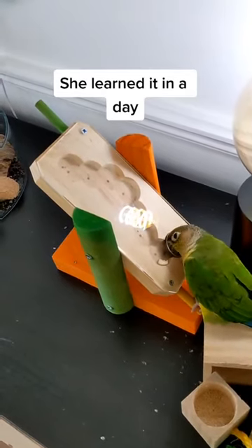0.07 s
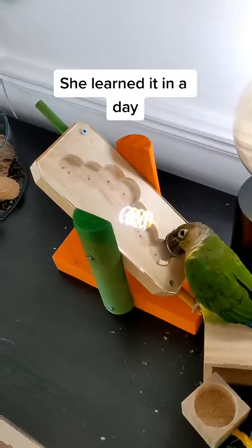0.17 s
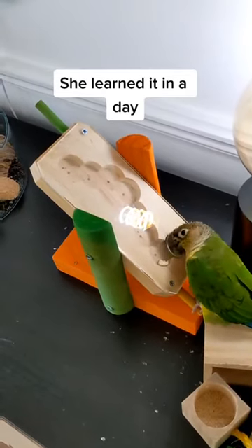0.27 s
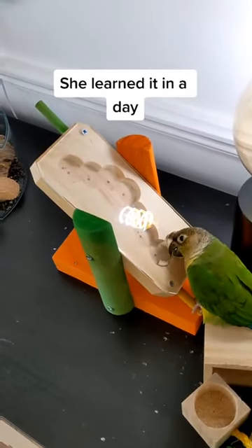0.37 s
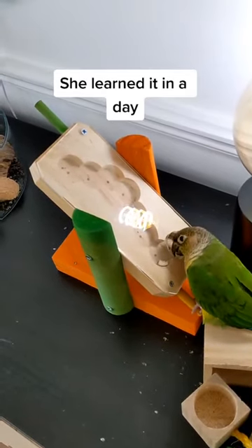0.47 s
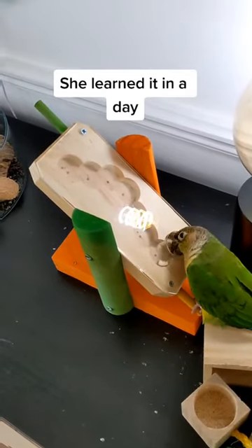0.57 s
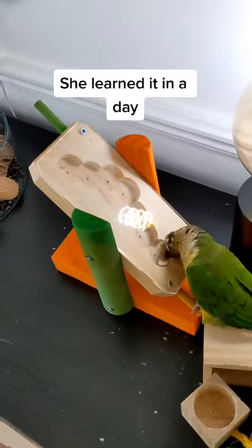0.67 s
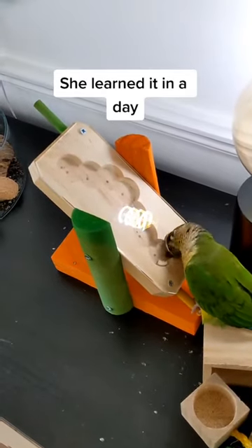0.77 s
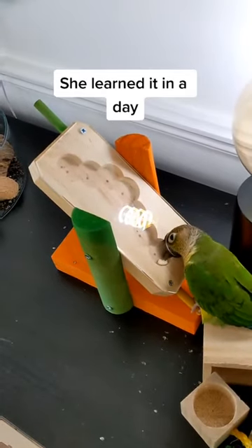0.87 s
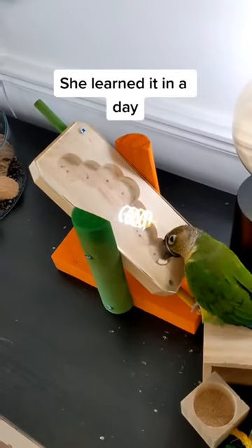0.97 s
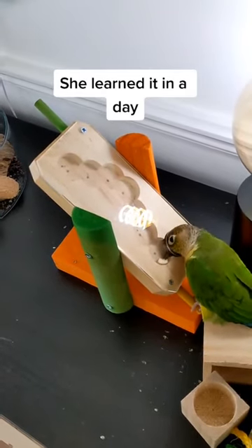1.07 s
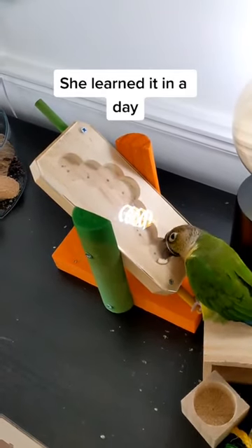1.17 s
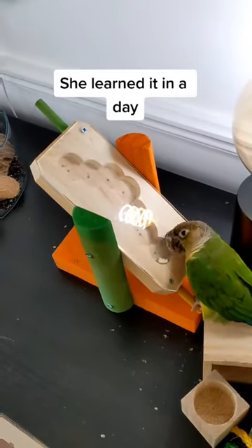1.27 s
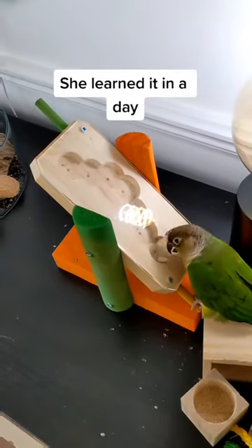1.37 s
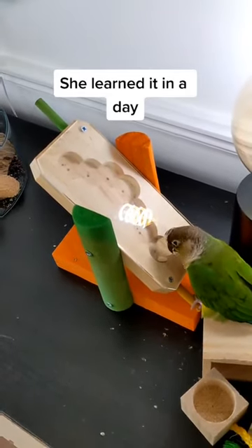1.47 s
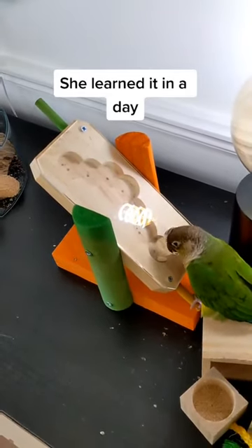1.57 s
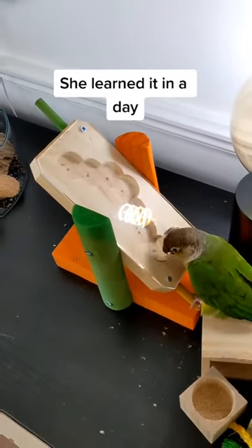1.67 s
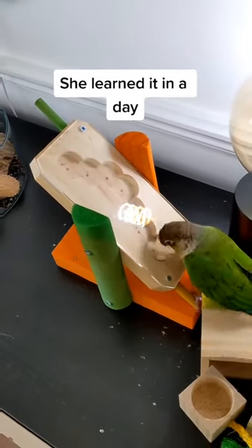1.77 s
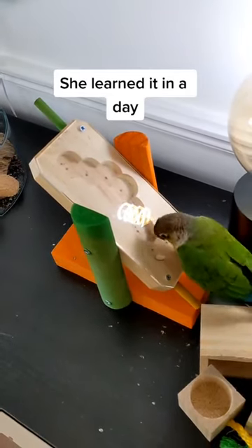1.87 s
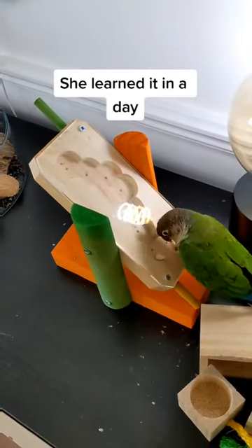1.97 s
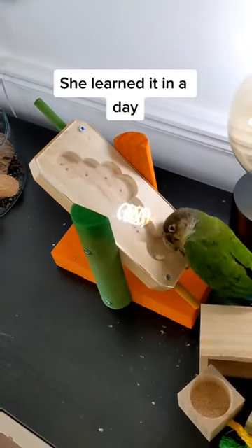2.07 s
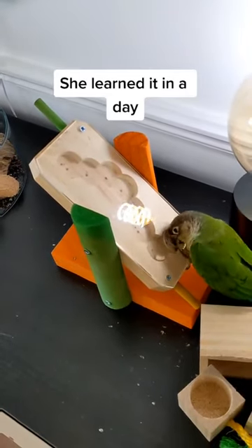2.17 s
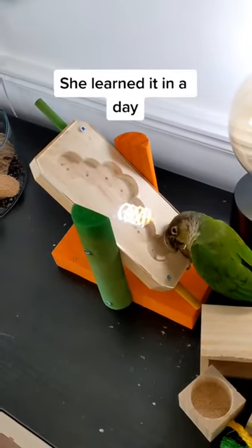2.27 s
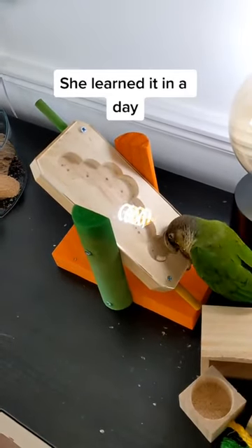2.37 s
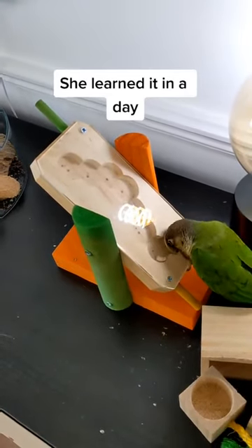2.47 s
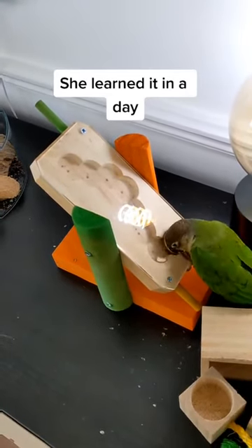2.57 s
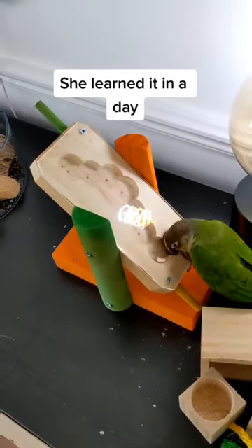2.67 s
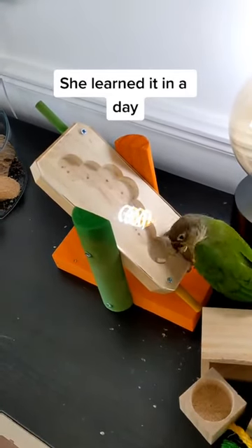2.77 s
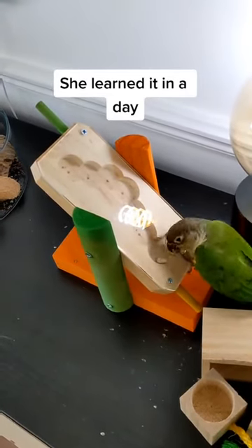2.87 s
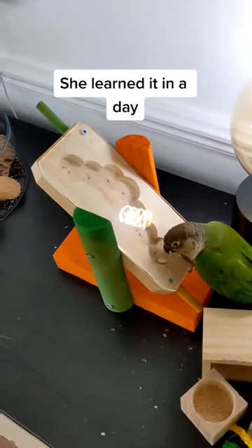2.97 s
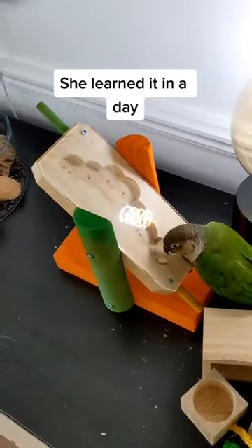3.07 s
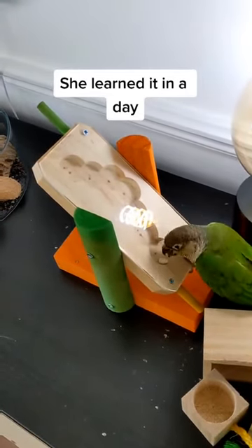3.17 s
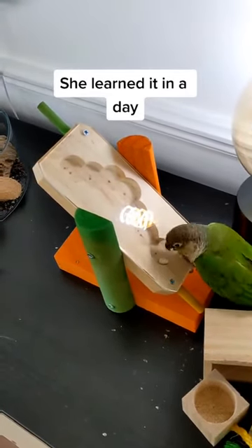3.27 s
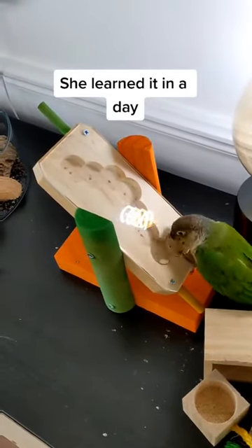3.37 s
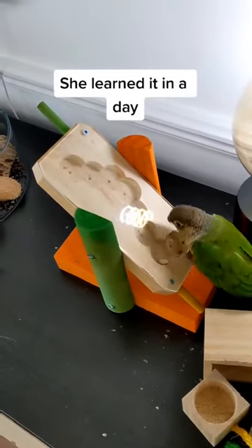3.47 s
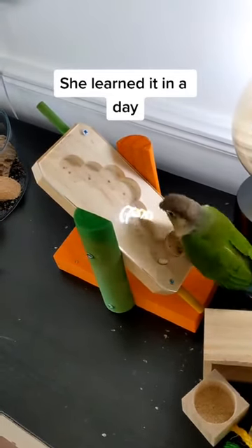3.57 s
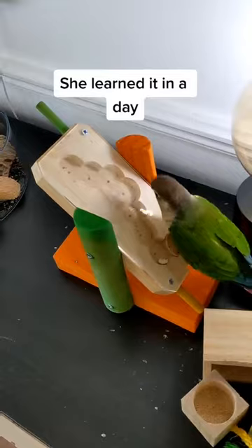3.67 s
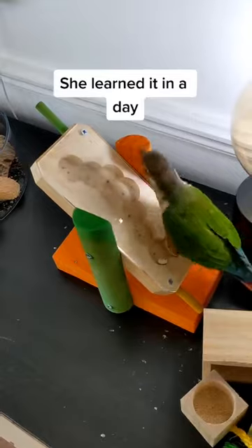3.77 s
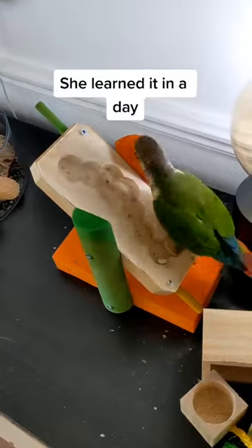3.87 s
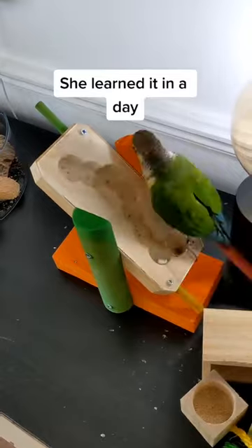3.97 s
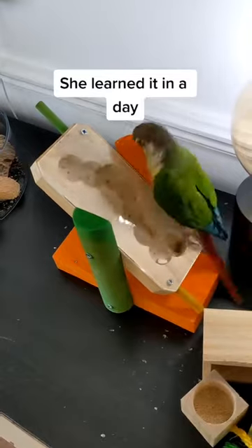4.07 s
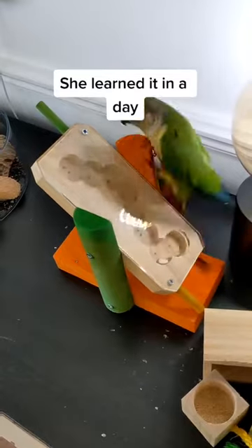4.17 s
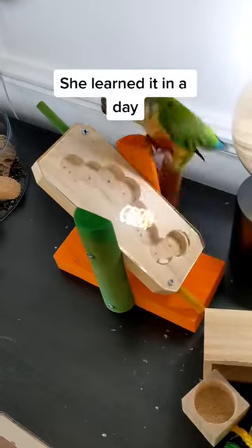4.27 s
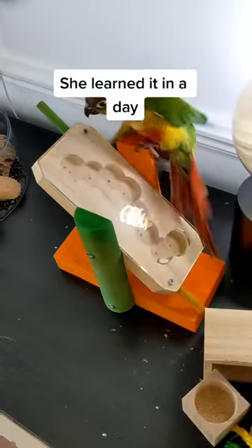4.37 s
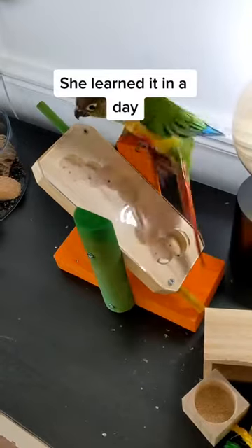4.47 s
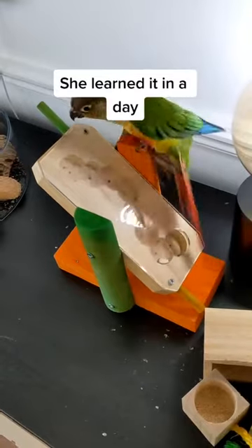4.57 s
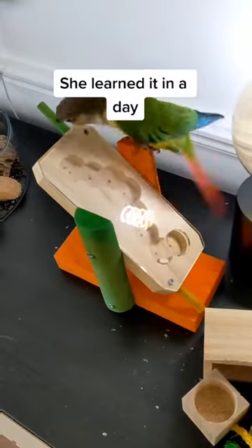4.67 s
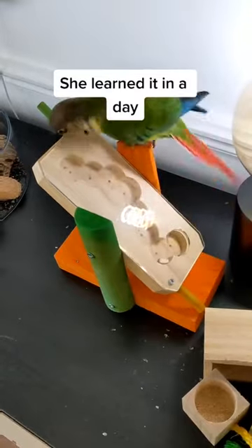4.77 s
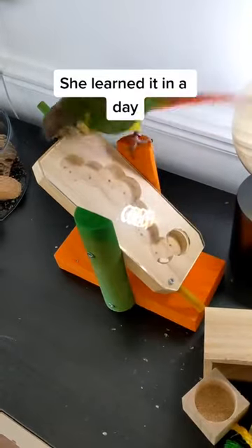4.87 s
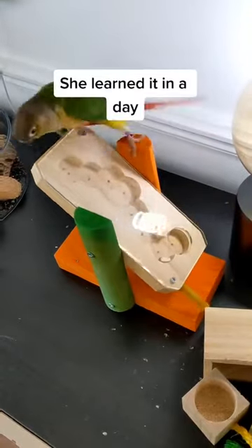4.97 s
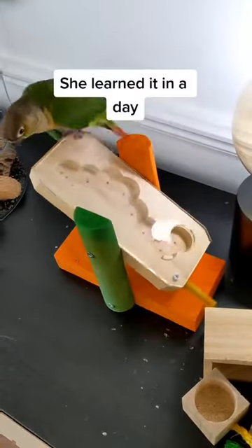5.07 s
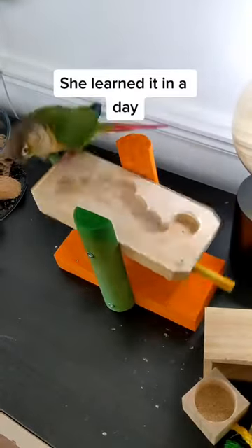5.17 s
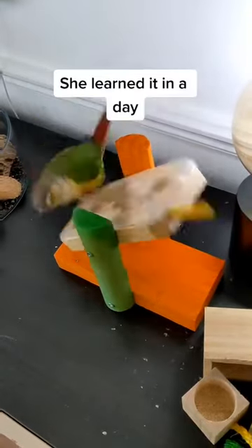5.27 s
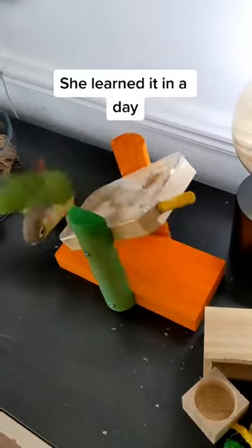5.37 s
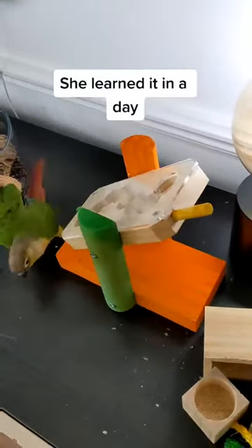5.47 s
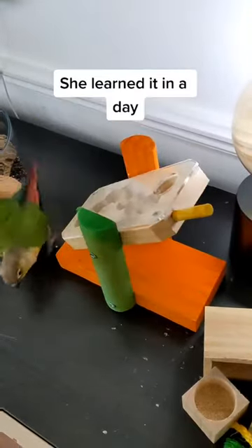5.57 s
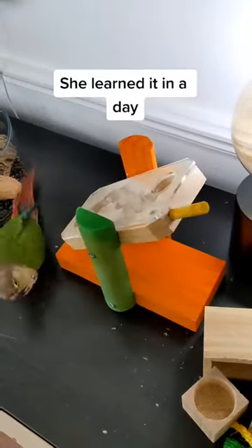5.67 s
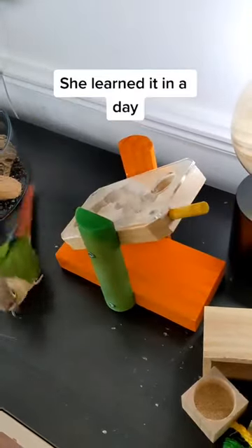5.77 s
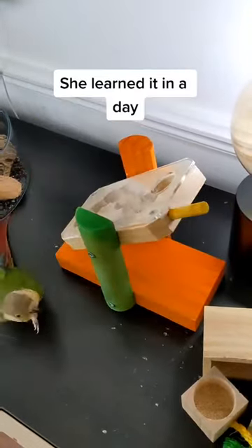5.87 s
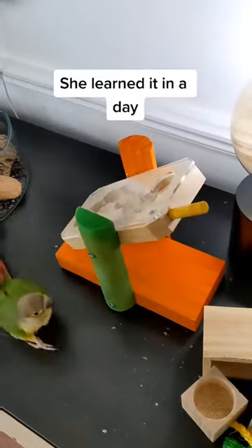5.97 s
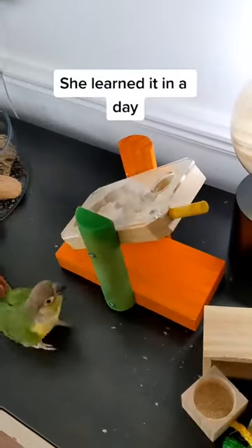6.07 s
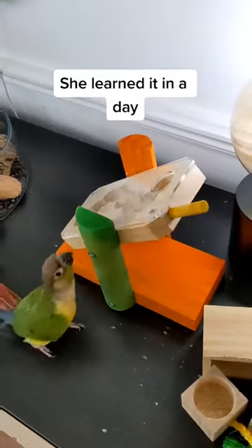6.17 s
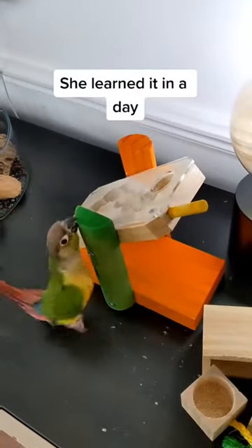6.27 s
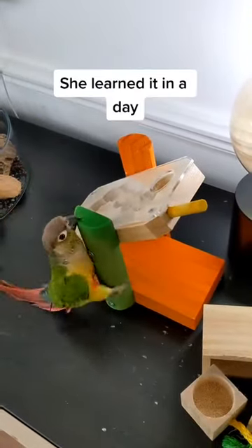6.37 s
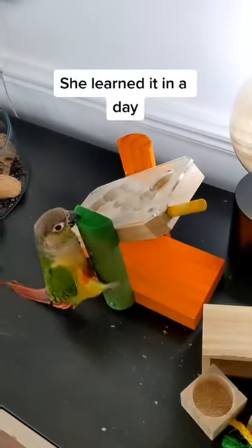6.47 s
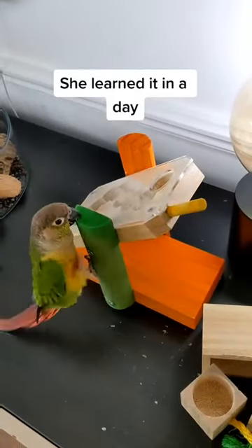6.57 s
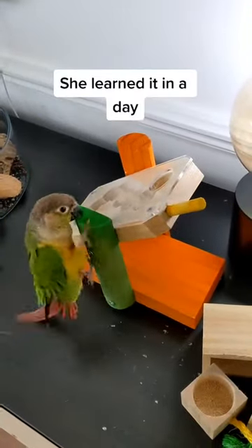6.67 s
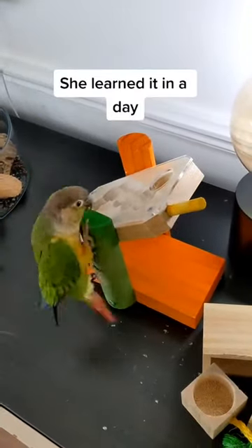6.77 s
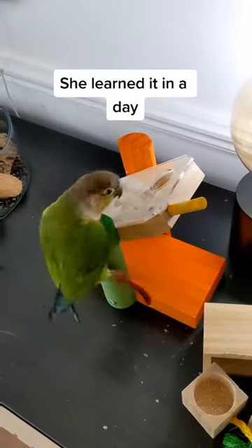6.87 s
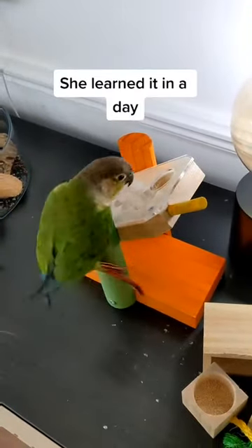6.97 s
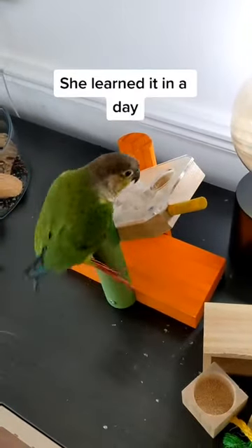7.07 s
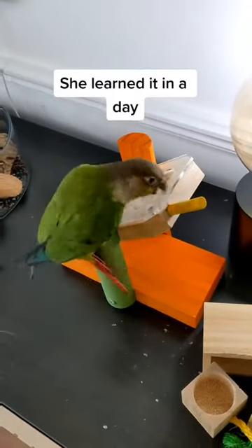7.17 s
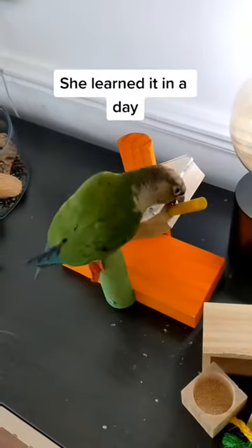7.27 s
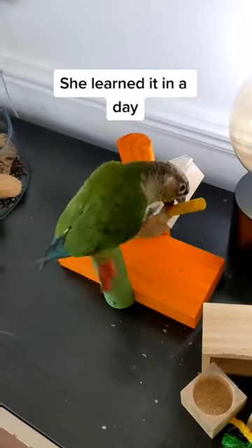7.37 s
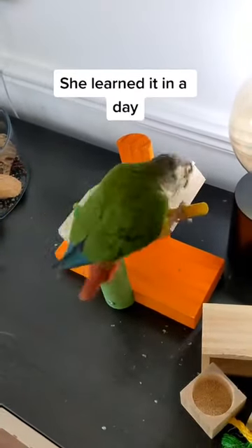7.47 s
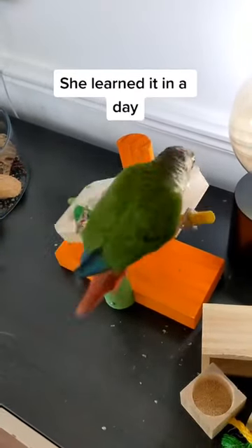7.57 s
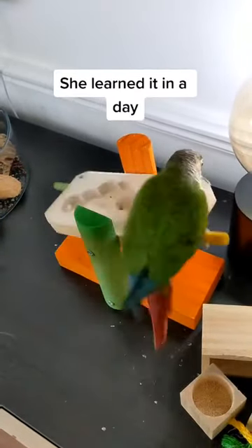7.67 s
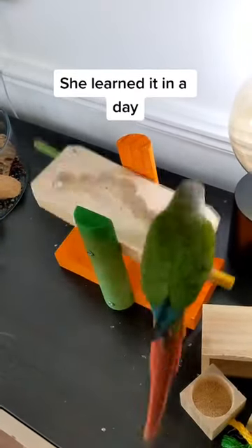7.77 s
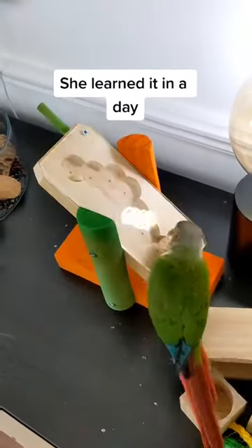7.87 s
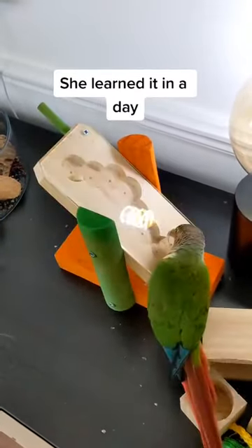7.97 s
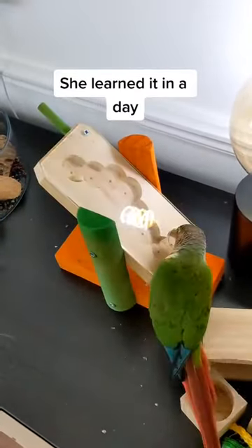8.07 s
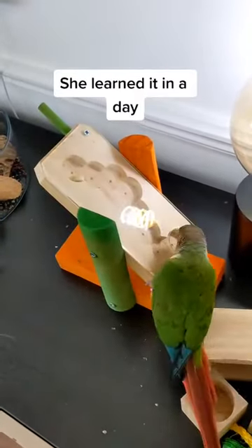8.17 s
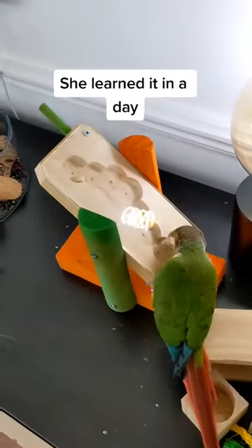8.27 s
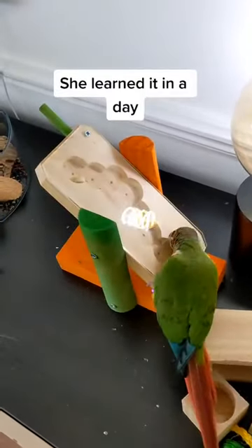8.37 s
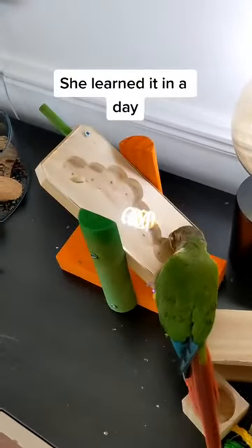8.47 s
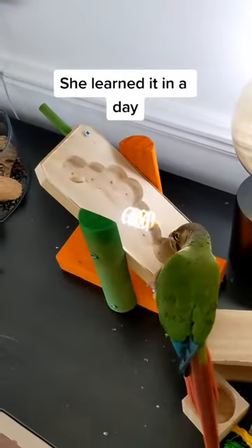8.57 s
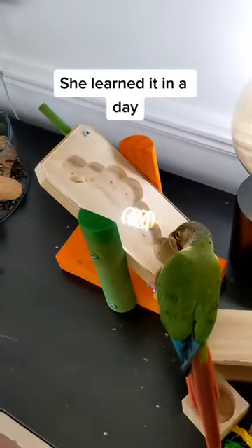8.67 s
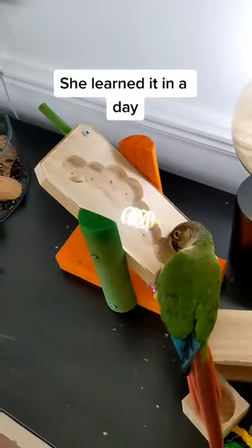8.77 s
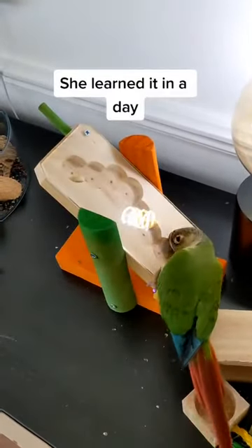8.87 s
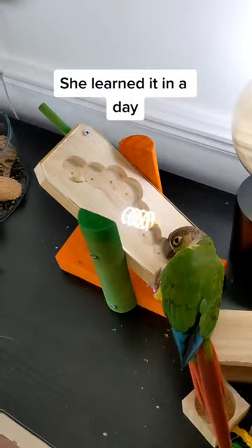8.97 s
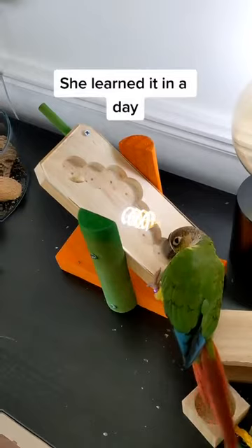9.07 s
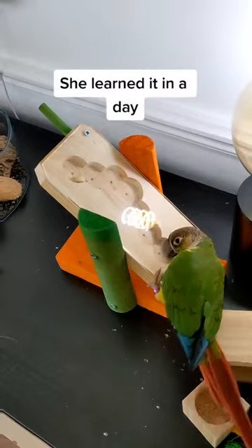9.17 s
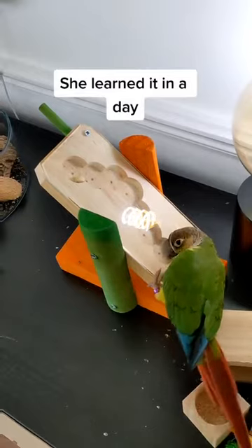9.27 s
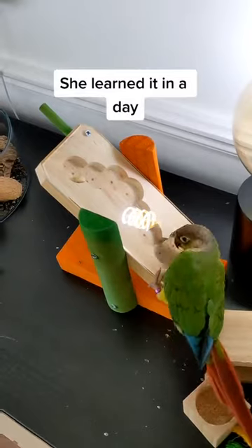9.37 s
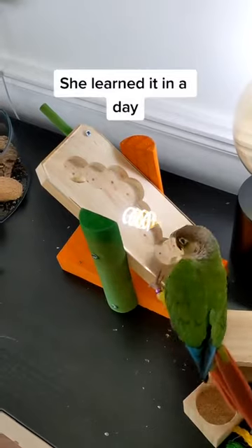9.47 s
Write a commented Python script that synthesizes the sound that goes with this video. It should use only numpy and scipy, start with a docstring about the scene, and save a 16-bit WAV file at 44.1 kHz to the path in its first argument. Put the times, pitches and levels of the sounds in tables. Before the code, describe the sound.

Faint beak taps, claw scratches and seed rattle on a wooden bird toy, then two hard wooden slams over low indoor hum.

```python
"""Over mains hum, faint drones, rumble and hiss, a small parrot starts pecking at a wooden seesaw puzzle.
Its beak and claws tick (noise bursts through resonators), feet and feathers scuff (coloured slips) and
seeds rattle in the cavity (filtered clicks), while soft landings boom (struck wood modes).
At 5.4 s the seesaw slams down, at 7.9 s it slams again: wood modes plus a crack of noise, in a small room.
A few ticks follow until 8.5 s, and scuffs go on to the end."""
import sys
import numpy as np
from scipy import signal
from scipy.fft import rfft, irfft
from scipy.io import wavfile
from scipy.ndimage import uniform_filter1d

SR = 44100
rng = np.random.default_rng(int(sys.argv[2]) if len(sys.argv) > 2 else 0)


def digitize_waveform(pressure):
    """Quantize a signal to 16-bit integers and store it at the path in sys.argv[1].

    Rows of a 2-D input are taken as channels; values are limited to [-1, 1].
    """
    field = np.atleast_2d(pressure).T
    bounded = np.clip(field, -1, 1)
    quanta = np.round(bounded * 32767).astype(np.int16)
    wavfile.write(sys.argv[1], SR, quanta)


N = 419391  # length in samples

# beak and claw ticks: (t/s, block peak level/dB, ring f/Hz, hollow peak level/dB, treble peak level/dB,
# t60/s, held to 0.2 at most)
TICKS = [(0.167, -81, 2140, -45, -66, 0.034), (0.208, -45, 2230, -42, -59, 0.04),
         (0.217, -46, 2080, -37, -51, .08), (0.445, -73, 2190, -55.5, -75, .02),
         (0.5026, -63, 2760, -49, -66, 0.026), (0.726, -58, 2290, -76, -76, .02),
         (0.7953, -40.5, 2080, -36.5, -58, 0.023), (0.8358, -76, 2350, -49, -74, .034),
         (0.8987, -63, 2190, -56.5, -73, 0.055), (1.0018, -61, 2420, -63, -49, .065),
         (1.3434, -44.5, 4200, -48.5, -40.5, 0.055), (1.982, -64, 6870, -59.5, -40, .021),
         (3.4191, -51.5, 3980, -52.5, -86, .026), (3.5197, -65, 2210, -53, -70, .025),
         (3.5538, -48.5, 2200, -56, -67, 0.13), (3.7294, -71, 2200, -56, -62, 0.13),
         (3.7838, -64, 6970, -53.5, -42, 0.08), (3.921, -59, 3530, -44, -64, 0.04),
         (3.959, -58, 3640, -52, -49, 0.023), (4.1323, -45.5, 4260, -49.5, -40.5, 0.26),
         (4.2301, -44.5, 2110, -44.5, -40, 0.058), (4.346, -47, 3600, -53.5, -38.5, 0.071),
         (4.4353, -42.5, 3700, -48.5, -41, 0.25), (4.5136, -47.5, 3970, -51, -37, 0.23),
         (4.6632, -68, 3610, -42, -61, 0.024), (4.7506, -47, 3640, -51, -55, 0.097),
         (4.815, -73, 2230, -39, -69, 0.051), (4.864, -67, 1780, -43.5, -57, 0.019),
         (5.009, -46, 2330, -53, -74, 0.059), (5.055, -49.5, 2260, -66, -72, .03),
         (5.1596, -56, 4200, -56, -36, .02), (5.1937, -57, 2340, -45, -60, 0.034),
         (5.26, -35.5, 4440, -37, -19.5, 0.032), (5.3391, -38.5, 5230, -47, -28.5, 0.035),
         (5.375, -70, 2327, -38.5, -70, 0.044), (5.5632, -31, 3670, -42, -16, 0.028),
         (5.5719, -41.5, 3430, -33, -35, 0.037), (5.737, -69, 6840, -60, -52, 0.024),
         (5.7721, -46, 2560, -45.5, -35.5, 0.048), (5.8562, -42, 3630, -61, -31, 0.035),
         (5.8786, -43, 6870, -48, -30, .011), (5.9306, -49, 5900, -80, -37, 0.037),
         (6.093, -54.5, 6260, -80, -40, .03), (6.1125, -52, 6900, -50.5, -37, 0.032),
         (6.3869, -51, 2900, -44.5, -51, 0.13), (7.036, -42.5, 4460, -63, -56, 0.092),
         (7.2046, -49, 2900, -84, -69, 0.049), (7.281, -47, 3100, -54, -65, 0.25),
         (7.3247, -52, 2880, -35, -33, 0.068), (7.353, -48, 1900, -47, -58, 0.068),
         (7.4377, -51, 2900, -69, -70, 0.084), (7.6185, -48.5, 2900, -50.5, -64, 0.072),
         (7.7318, -44.5, 4330, -49, -73, 0.06), (7.7822, -37.5, 3100, -44, -30, 0.026),
         (7.8383, -47, 2320, -63, -62, 0.035), (8.4223, -48, 4230, -64, -64, .023),
         (8.4672, -52.5, 4200, -80.5, -70, .028)]
# tick colour of the block: (f/Hz, width/Hz, level/dB)
BLOCK_RESONANCES = [(2250, 450, -1), (3650, 500, -2), (4450, 600, -2), (5500, 1000, -4), (6900, 900, -6)]
# cavity of the puzzle, passed through twice: (f/Hz, width/Hz, level per pass/dB)
CAVITY_RESONANCES = [(1100, 200, -6), (1270, 170, -2), (1400, 120, 0)]
TICK_SPREAD_DB = 5.5  # rms left-right scatter
RING_SHARPNESS, RING_DB = 14, 12  # the part touched: f over width, and resonance level


def ticks():
    """Each tick is a dying noise burst through the block, the part touched, the cavity and a bright edge."""
    out, t = np.zeros((2, N)), np.arange(5000) / SR
    edge_filter = signal.butter(4, 8000, "high", fs=SR, output="sos")
    noises = rng.standard_normal((len(TICKS), 5000))
    for (s, block_db, hz, hollow_db, treble_db, t60), noise in zip(TICKS, noises):
        decay = amp(-60 * t / np.clip(t60, .004, .2))
        attack = np.minimum(t / 0.003, 1)
        burst = noise * decay * attack
        part_touched = (hz, hz / RING_SHARPNESS, RING_DB)
        block = ringing(burst, BLOCK_RESONANCES + [part_touched])
        walls = ringing(burst, [(800, 2200, -9.5)])  # the walls knock along
        hollow = through_cavity(burst) + walls
        edge = signal.sosfilt(edge_filter, burst)
        layers = (block_db, block), (hollow_db, hollow), (treble_db, edge)
        tick = sum(amp(db) * layer / abs(layer).max() for db, layer in layers)
        add(out, s, tick, TICK_SPREAD_DB * noise[-1])
    return out


def through_cavity(x):
    """Two passes through the resonances of the hollow puzzle."""
    return ringing(ringing(x, CAVITY_RESONANCES), CAVITY_RESONANCES)


# the bird's weight lands and the tabletop booms: (t/s, level/dB, contact/ms)
THUMPS = [(0.209, -65, 1.4), (2.571, -65.5, 1.3), (4.159, -62.5, 1.6), (4.826, -56, 3), (4.856, -58.5, 2.7),
          (5.435, -32, 1.77), (5.544, -40, 2.3), (5.577, -41, 5.6), (5.608, -60, 6.2), (6.404, -63, 3.8),
          (6.438, -64.5, 5.2), (7.329, -61, 3), (7.355, -58.5, 4), (8.466, -62, 2.64)]
# the seesaw hits its base: (t/s, level/dB, crack peak level/dB, contact/ms, chatter/ms, left-right/dB)
SLAMS = [(5.394, -17.5, -6, .2, 6, -1.5), (7.928, -18.5, -18.5, 0.2, 4.94, 1.5)]
# splinter of noise at the far, then at the near slam: (f/Hz, level per Hz/dB)
CRACK_SPECTRA = [
    [(880, -40), (1500, -2.5), (1790, -8.5), (3220, -6), (3550, -9.5), (4550, -2), (5770, -13), (7170, -16),
     (7920, -22.5), (12600, -14), (16000, -23.5)],
    [(880, -9.5), (1500, -23.5), (1720, -13), (2300, -11), (3520, -25.5), (4550, -12.5), (5330, -30.5),
     (11400, -35.5), (13900, -24), (16000, -47)],
]


def blows():
    """Soft landings ring the wood; the two slams ring it harder and add a crack."""
    out = np.zeros((2, N))
    for s, db, ms in THUMPS:
        end = 1 + (s > 6)  # far end until 6 s, near end after
        add(out, s, amp(db) * wood(contact(ms), end))
    for k, (s, db, crack_db, ms, chatter_ms, pan_db) in enumerate(SLAMS):
        add(out, s, amp(db) * wood(contact(ms), end=k + 1))
        add(out, s, amp(crack_db) * crack(CRACK_SPECTRA[k], chatter_ms), pan_db)
    return out


# seesaw, base and tabletop: (f/Hz, level struck at the far end/dB, level struck at the near end/dB)
WOOD_MODES = [(75.6, -10.5, -10.5), (104.5, -22.5, -0.5), (142.6, 0, -3), (172, -7, -2), (206, 3, -1.5),
              (241, -8.5, -12), (274, -2, -3.5), (333, -11, -8.5), (364, -10, -8.5), (424, 7, 1.5),
              (495, -0.5, -9.5), (560.6, -1, -5.5), (630, -8.5, -9), (669, 3, -10.5), (735, 5.5, -7),
              (827, 9, -3.5), (937, -11.5, -12), (1052, 2, -7.5), (1164, -7.5, -7), (1264, 5.5, -8.5),
              (1420, -2, -2.5), (1522, -12, -31), (1890, -14.5, -16), (2305, -14.5, -5), (2750, -26, -39),
              (3300, -14.5, -17), (3845, -11, -37.5), (4750, -3.5, -18), (5120, -10, -25)]


def wood(push, end):
    """A force pulse rings all modes, weighted by the end struck; each builds up over a cycle or so."""
    t, ring = np.arange(SR // 2) / SR, 0
    for k, mode in enumerate(WOOD_MODES):
        hz, db = mode[0], mode[end]
        t60 = .27 * (100 / hz) ** .68  # wood damps high modes faster
        rise = 1 - np.exp(-t * hz / 0.43)
        sign = (-1) ** k
        ring = ring + sign * amp(db - 60 * t / t60) * rise * np.sin(2 * np.pi * hz * t)
    out = signal.fftconvolve(ring, push)
    return out / np.sqrt(np.mean(out[:600] ** 2))  # rms 1 over the onset


def contact(ms):
    """Force of a soft contact: a smooth hump of the given length."""
    return np.hanning(max(round(ms * SR / 1000), 1) + 2)


def crack(spectrum, ms):
    """All bands break loose within a few ms, each after its own delay."""
    hz = np.fft.rfftfreq(4096, 1 / SR)
    band_delay = np.repeat(rng.random(65) ** 2, 32)[:len(hz)]
    delay = .001 + ms / 1000 * uniform_filter1d(band_delay, size=16)
    phase = -2 * np.pi * np.cumsum(delay) * hz[1]  # delay summed over frequency
    out = irfft(amp(read(spectrum, hz)) * np.exp(1j * phase))[:2048]
    return out / abs(out).max()


# scuff colours: (f/Hz, level per Hz/dB)
FIZZ_SPECTRUM = [(4120, -41.5), (7000, -6.5), (8240, -12), (9590, -3), (10400, -9), (11800, 1), (14600, 2),
                 (16000, -25)]
BODY_SPECTRUM = [(880, -32.5), (1500, -4.5), (2020, -4.5), (2200, 3), (2630, -3.5), (3630, -0.5),
                 (6000, -1.5), (6670, -6.5), (9000, -16), (11700, -54), (19800, -120)]


def scuff():
    """Dense tiny slips of feet and feathers: a bright fizz and a duller body, in short strokes."""
    pressure = evened(amp(1.6 * slow(size=400)))
    slips = pressure * (.8 * grains(3000, 4.) + .9 * rng.standard_normal((2, N)))
    fizz = stroked(column=2) * coloured(slips, FIZZ_SPECTRUM)
    body = stroked(column=3) * coloured(slips, BODY_SPECTRUM)
    return fizz + body


# loose joints ring above the cavity: (f/Hz, width per pass/Hz, level/dB)
JOINTS = [(2300, 160, -11.5), (3700, 260, -15.5)]


def rattle():
    """Seeds and loose joints click into the cavity, each click ringing its resonances."""
    clicks = grains(900, 3.)
    cavity = evened(through_cavity(clicks))
    joints = 0
    for hz, width, db in JOINTS:
        resonance = [(hz, width, 0)]
        joints = joints + amp(db) * evened(ringing(ringing(clicks, resonance), resonance))
    return stroked(column=4) * (cavity + joints)


# feet and feathers slide and the seeds in the cavity shift:
# (start t/s, hold/s, fizz level/dB, body level/dB, seeds level/dB)
STROKES = [(0.147, 0.12, -76, -67, -83), (0.454, 0.36, -97, -85, -92), (0.8, 0.19, -84, -72, -80),
           (0.962, .2, -70.5, -70.5, -95), (1.2, 0.14, -75, -70.5, -95), (1.854, 0.45, -62.5, -73, -91),
           (3.412, 0.11, -80, -88, -84), (3.56, 0.13, -61, -65.5, -80), (3.725, 0.057, -63, -70, -68.5),
           (3.797, 0.34, -66, -69.5, -87), (4.142, 0.23, -56, -62.5, -69), (4.418, .14, -53, -62.5, -74),
           (4.618, 0.17, -58, -66.5, -65.5), (4.84, 0.25, -65, -69, -70.5), (5.126, 0.069, -59, -62.5, -90),
           (5.266, 0.27, -61, -62, -67), (5.538, 0.082, -45.5, -50, -75), (5.747, 0.13, -49.5, -59, -71),
           (5.93, .05, -55, -65.5, -84), (5.984, 0.053, -47.5, -61.5, -78), (6.098, 0.13, -54, -63.5, -83),
           (6.194, 0.057, -56.5, -63, -77), (6.301, 0.073, -53.5, -60.5, -68.5),
           (6.422, 0.042, -47, -56, -73), (6.509, 0.098, -62.5, -60.5, -76), (6.655, 0.058, -64, -70, -88),
           (6.77, 0.096, -59.5, -63.5, -74), (6.89, .04, -58, -63, -70), (6.937, 0.021, -52.5, -57, -73),
           (7.01, 0.23, -62.5, -65.5, -77), (7.279, 0.094, -60, -58.5, -64.5), (7.447, .2, -65, -65.5, -69),
           (7.65, 0.098, -72, -65, -65), (7.785, 0.1, -61.5, -57.5, -63.5), (7.967, 0.049, -51, -53.5, -83),
           (8.1, 0.23, -73, -79, -89), (8.719, .04, -66, -62, -94), (8.88, .05, -72, -65.5, -108),
           (9.173, 0.037, -63.5, -67.5, -97), (9.258, .03, -72, -76.5, -94), (9.45, .06, -67, -75, -98.5)]
RISE_DB_PER_S, FADE_DB_PER_S = 606.5, 212.5  # before and after the hold of a stroke


def stroked(column):
    """Level of one layer: every stroke rises fast, holds and fades; their powers add."""
    t = np.arange(0, N / SR, .001)
    start, hold, db = np.array(STROKES).T[[0, 1, column], :, None]
    before, after = np.maximum(start - t, 0), np.maximum(t - start - hold, 0)
    below_db = RISE_DB_PER_S * before + FADE_DB_PER_S * after
    return curve(np.c_[t, np.linalg.norm(amp(db - below_db), axis=0)])


def grains(per_s, spread_db):
    """Sparse clicks of random sign, a few large."""
    size = amp(spread_db * np.minimum(rng.exponential(1, N), 4)) * rng.choice([-1., 1.], N)
    return evened(size * (rng.random(N) < per_s / SR))


# decay of the room: (f/Hz, t60/s)
ROOM_DECAY = [(100, 0.066), (400, 0.47), (1500, 0.36), (5000, 0.44), (14000, 0.22)]
# what the room throws back: (f/Hz, level/dB)
WALLS = [(300, -1), (1500, -1.5), (4500, -4.5), (12000, -2)]


def room(x):
    """Reflections as sparse taps of random sign, each band dying at its own speed."""
    taps = np.zeros((2, SR))
    at = np.arange(200, SR - 20, 20) + rng.integers(0, 20, (2, (SR - 201) // 20))
    np.put_along_axis(taps, at, rng.choice([-1., 1.], at.shape), 1)
    hz, t, z = signal.stft(taps, SR, nperseg=256)
    decay = amp(-60 * t / read(ROOM_DECAY, hz)[:, None])
    tail = signal.istft(z * decay, SR, nperseg=256)[1]
    wet = signal.fftconvolve(x, tail / np.linalg.norm(tail[0]), axes=1)[:, :N]
    return irfft(rfft(wet) * amp(read(WALLS, np.fft.rfftfreq(N, 1 / SR))), N)


# how much the two microphone ports differ: (f/Hz, side level/dB)
PORT_WIDTH = [(60, -8), (150, -12), (400, -8), (1500, 2.5), (5000, 4)]
# lean of the ports: (f/Hz, left-right/dB)
PORT_BALANCE = [(60, -0.5), (300, -3.5), (1200, -3), (2500, -0.5), (5000, 7.5), (9000, 1.5), (13000, 3)]


def ports(x):
    """Close ports hear bass alike and favour one side by band: mid-side width, then left-right lean."""
    hz, (left, right) = np.fft.rfftfreq(N, 1 / SR), rfft(x)
    mid = (left + right) / 2
    side = (left - right) / 2 * amp(read(PORT_WIDTH, hz))
    lean = amp(read(PORT_BALANCE, hz) / 2)
    return irfft(np.array([(mid + side) * lean, (mid - side) / lean]), N)


# course of the low room tone: (t/s, rumble level/dB)
ROOM_TONE = [(0.0, -58.5), (0.43, -61), (0.9, -68), (1.74, -70), (2.5, -68.5), (3.5, -70.5), (4.6, -68.5),
             (5.3, -67), (5.85, -60), (6.4, -57.5), (6.8, -60.5), (7.17, -59), (8.3, -60.5), (9.51, -61.5)]
# faint fuzzy tones in the room: (f/Hz, width/Hz, level/dB)
DRONES = [(148, 2.3, -79), (370, 10, -86)]
# rumble and hiss colours: (f/Hz, level per Hz/dB)
RUMBLE_SPECTRUM = [(36, -28.5), (62, 8.5), (81, -7), (146, -17), (169, -19), (232, -17), (315, -28),
                   (370, -22), (401, -28), (559, -23), (721, -30), (812, -23), (966, -30.5), (1500, -30.5),
                   (1950, -61), (3300, -120)]
HISS_SPECTRUM = [(410, -34), (700, -11.5), (728, -10), (1110, -11), (1300, -10), (1460, -23), (1970, -8.5),
                 (6830, -14.5), (9110, -20.5), (14600, -16.5), (16000, -23)]
HISS_DB = -69
# the hum follows the rumble around -64 dB, and its level dips as it wavers
HUM_HZ, HUM_OVER_DB, HUM_FOLLOWS, WAVER_DB = 50.7, 5.5, 0.71, 2


def room_tone():
    """Mains hum as a sine that drifts and wavers, drones of narrow noise, low rumble and hiss."""
    tone_db = curve(ROOM_TONE)
    waver_db = WAVER_DB * np.minimum(slow(size=2500) ** 2, 4)
    hum_db = -64 + HUM_FOLLOWS * (tone_db + 64) + HUM_OVER_DB - waver_db
    hum_hz = HUM_HZ + 1.3 * slow(size=3000)
    sine = np.sqrt(2) * np.sin(2 * np.pi * np.cumsum(hum_hz) / SR)
    hum = sine * amp(hum_db) * amp([[-.9], [.9]])  # a little louder on the right
    drones = 0
    for hz, width, db in DRONES:
        drones = drones + amp(db) * evened(ringing(rng.standard_normal(N), [(hz, width, 0)]))
    rumble = amp(tone_db) * air(RUMBLE_SPECTRUM, patchy_db=1.5, likeness=1.05)
    hiss = amp(HISS_DB) * air(HISS_SPECTRUM, patchy_db=0.43, likeness=0.84)
    return hum + drones + rumble + hiss


# left-right likeness of the air, scaled for each layer: (f/Hz, correlation)
LIKENESS = [(60, 0.95), (180, 0.84), (550, 0.65), (1650, 0.13), (4970, 0.21), (15000, 0.36)]


def air(spectrum, patchy_db, likeness):
    """Stereo noise with drifting patches in time and frequency."""
    hz = np.fft.rfftfreq(1024, 1 / SR)
    a, b, c, d, patches = rng.standard_normal((N // 256 + 5, 513, 5)).T
    patches = uniform_filter1d(uniform_filter1d(patches, size=10, axis=0), size=10, axis=1)
    same = np.clip(likeness * read(LIKENESS, hz), -1, 1)[:, None]
    left, other = a + 1j * b, c + 1j * d
    z = np.array([left, same * left + np.sqrt(1 - same ** 2) * other])
    z *= amp(read(spectrum, hz)[:, None] + patchy_db * evened(patches))
    return evened(signal.istft(z, nperseg=1024, noverlap=768)[1][:, :N])


def slow(size):
    """Smooth random wander of rms 1; size is the smoothing in samples."""
    return evened(uniform_filter1d(uniform_filter1d(rng.standard_normal(N), size=size), size=size))


def ringing(x, resonances):
    """Sum of two-pole resonances of unit peak gain, each weighted by its level."""
    return sum(amp(db) * signal.lfilter(*signal.iirpeak(hz, hz / width, SR), x)
               for hz, width, db in resonances)


def coloured(x, spectrum):
    """Shape x by a spectrum, at rms 1."""
    hz = np.fft.rfftfreq(x.shape[-1], 1 / SR)
    return evened(irfft(rfft(x) * amp(read(spectrum, hz)), x.shape[-1]))


def amp(db):
    """Decibels to amplitude."""
    return 10 ** (np.asarray(db) / 20)


def evened(x):
    """Scale to rms 1."""
    return x / np.sqrt(np.mean(x ** 2) + 1e-20)


def read(points, hz):
    """Read a table between its points on a log frequency axis."""
    f, value = np.transpose(points)
    return np.interp(np.log(hz + 1), np.log(f + 1), value)


def curve(rows):
    """Straight lines between (t/s, value) points."""
    return np.interp(np.arange(N) / SR, *np.transpose(rows))


def add(mix, s, sound, pan_db=0.):
    """Lay a sound into the mix at s seconds, pan_db louder on the left than on the right."""
    part = mix[:, round(s * SR):][:, :sound.shape[-1]]
    part += amp([[pan_db / 2], [-pan_db / 2]]) * sound[..., :part.shape[1]]


NEAR_WET_DB = -3.5  # room send of ticks and rattle, relative to the blows


def scene():
    """Blows and room pass the ports; ticks, rattle, scuffs and room tone join directly."""
    knocks = blows()
    near = ticks() + rattle()
    wet = room(knocks + amp(NEAR_WET_DB) * near)
    return ports(knocks + amp(0.5) * wet) + near + scuff() + room_tone()


EDGE_HZ = 15850  # upper band limit


def record(dry):
    """A steep low-pass limits the band."""
    low_pass = signal.firwin(511, EDGE_HZ, window=("kaiser", 9), fs=SR)
    return signal.oaconvolve(dry, low_pass[None], "same")


dry = scene()
out = record(dry)
digitize_waveform(out)
```